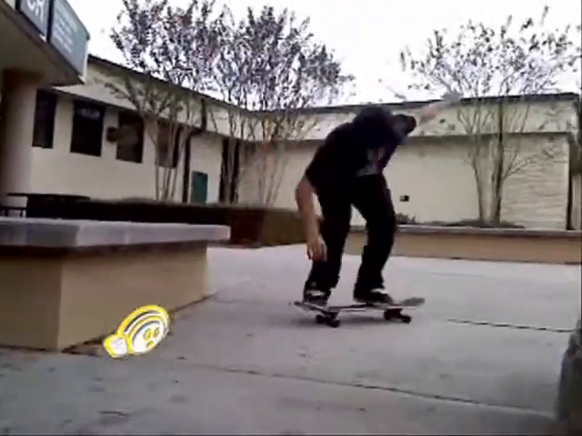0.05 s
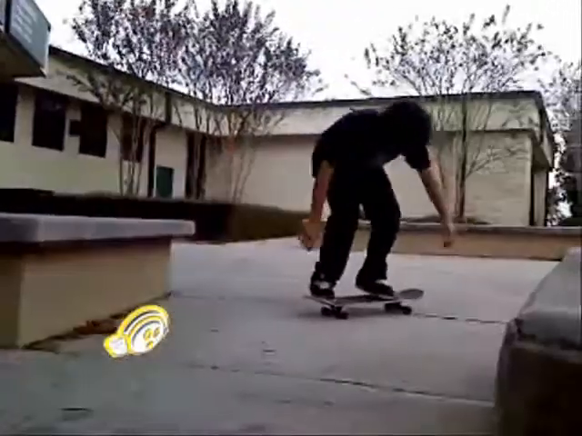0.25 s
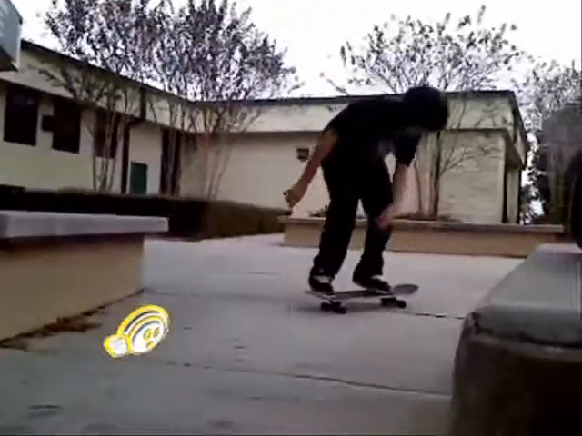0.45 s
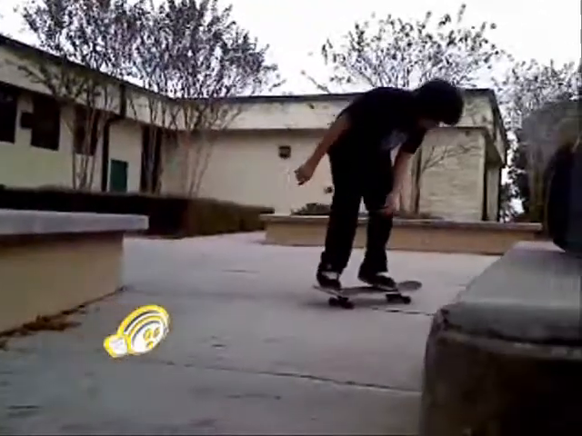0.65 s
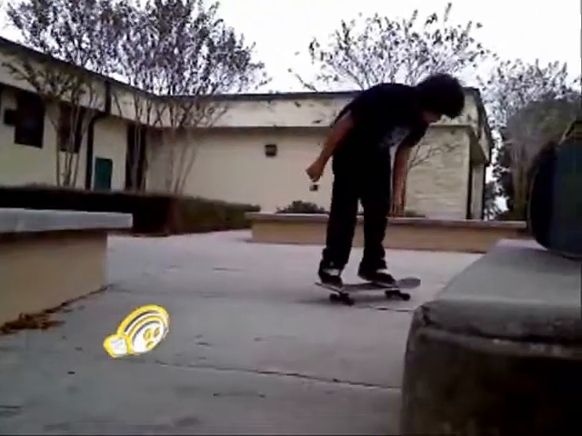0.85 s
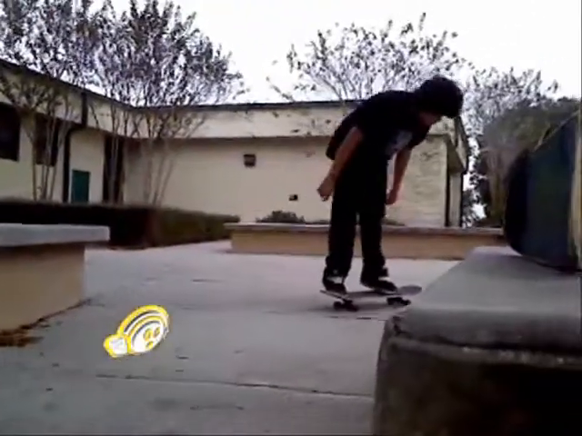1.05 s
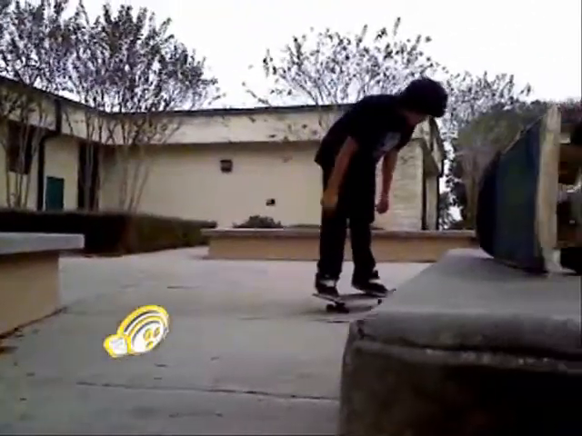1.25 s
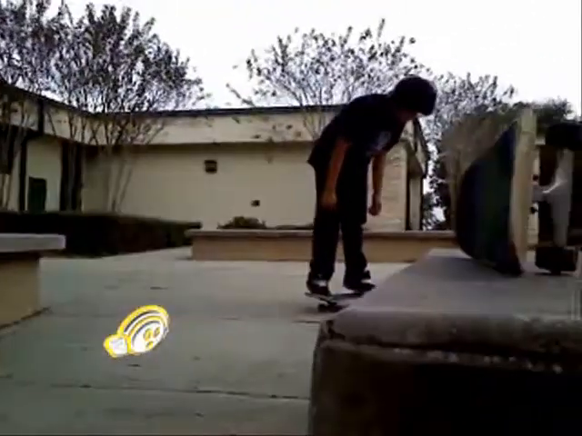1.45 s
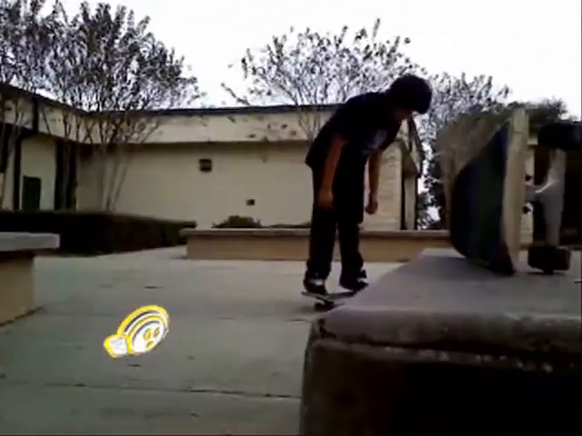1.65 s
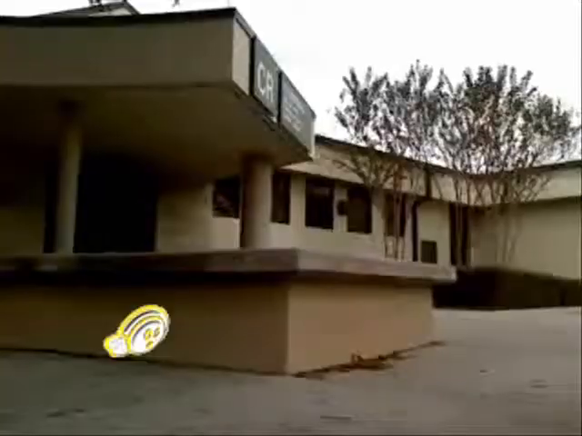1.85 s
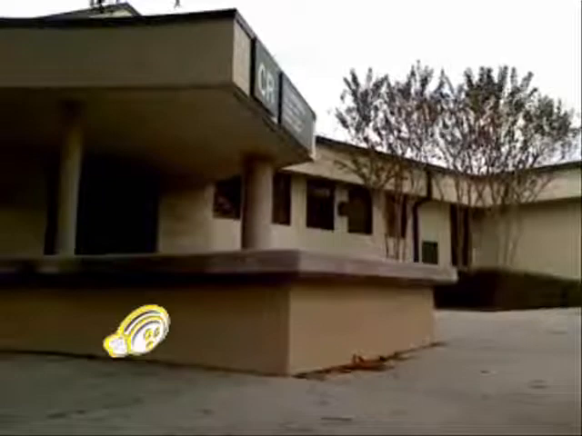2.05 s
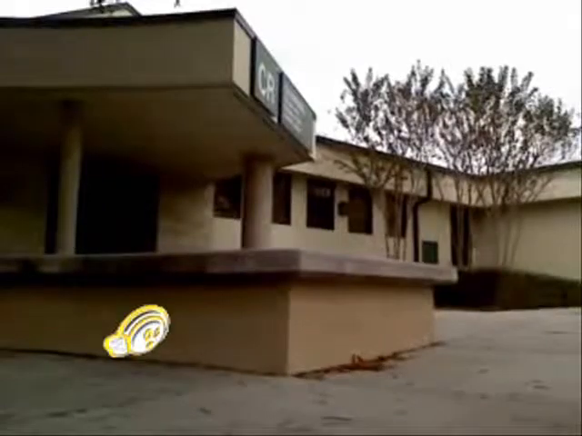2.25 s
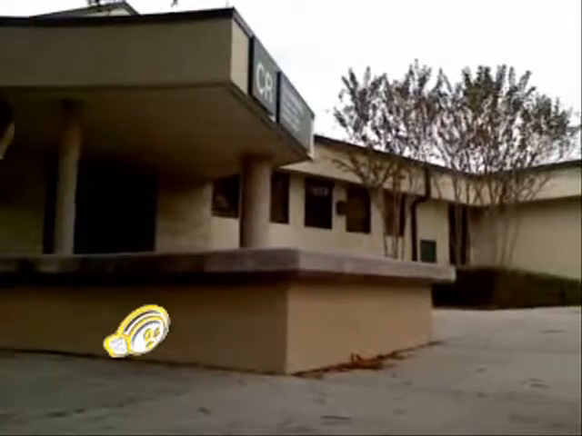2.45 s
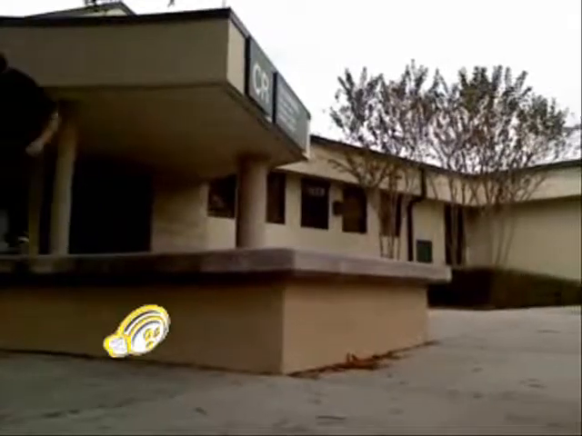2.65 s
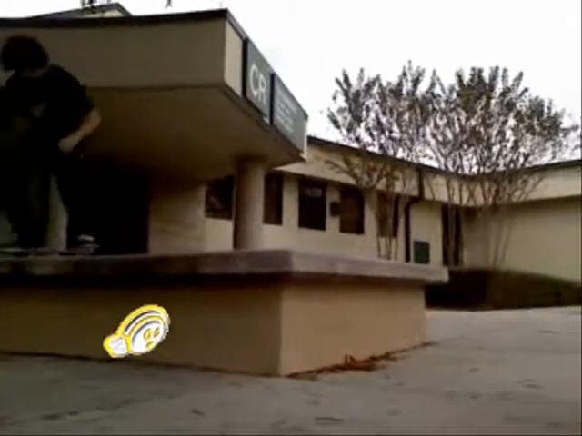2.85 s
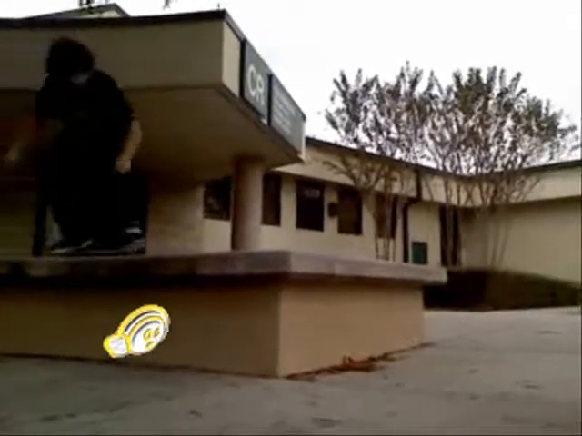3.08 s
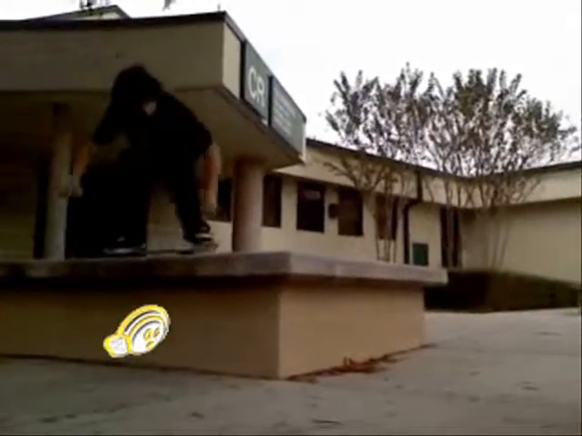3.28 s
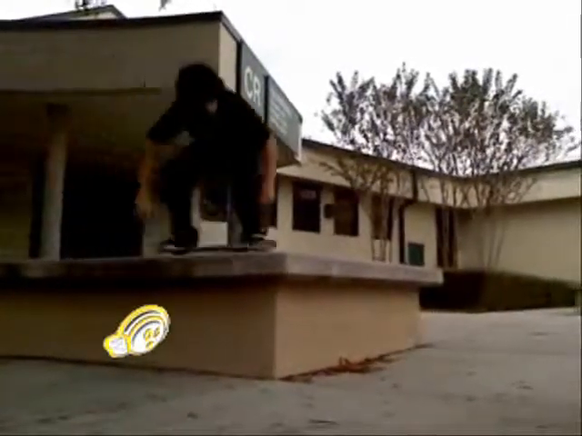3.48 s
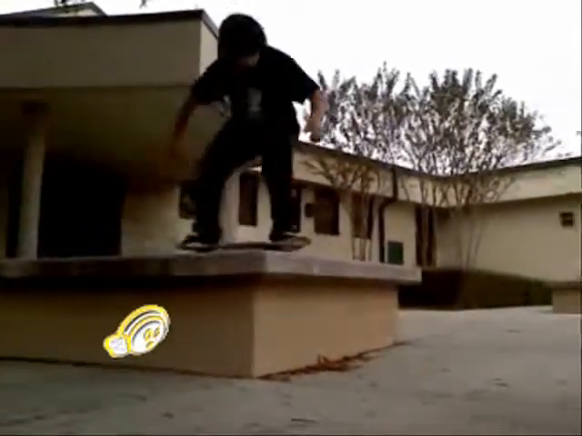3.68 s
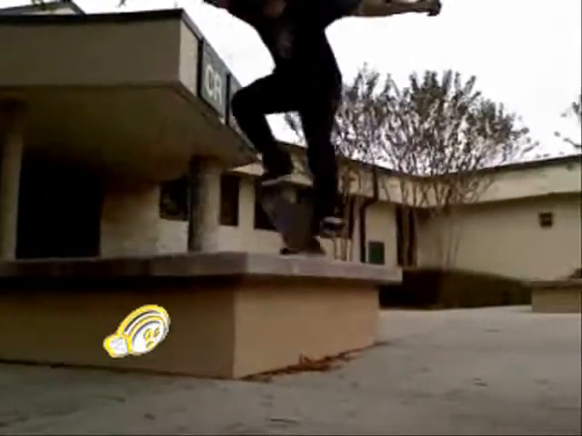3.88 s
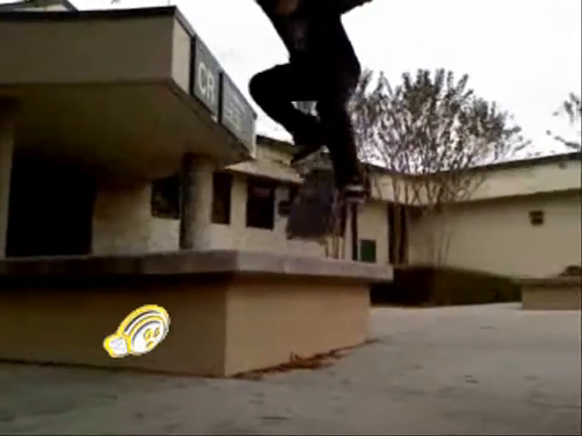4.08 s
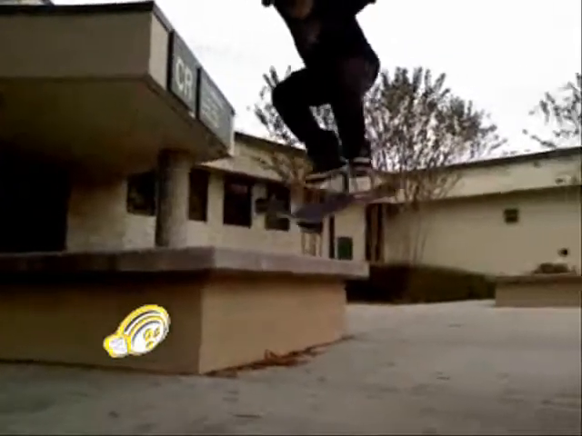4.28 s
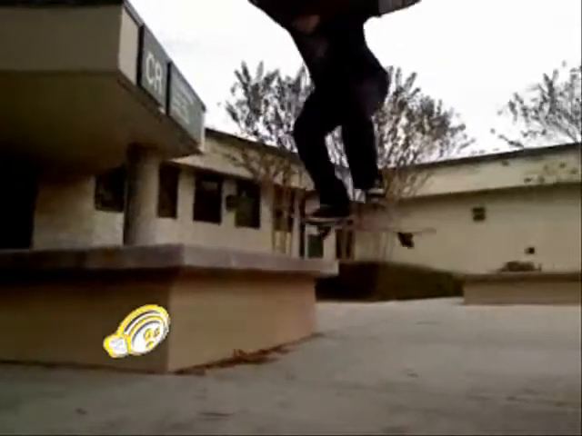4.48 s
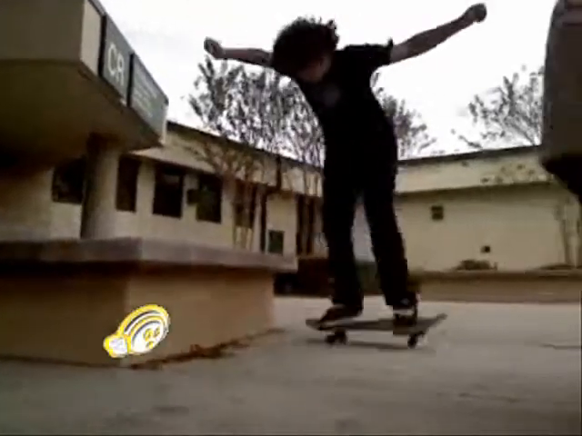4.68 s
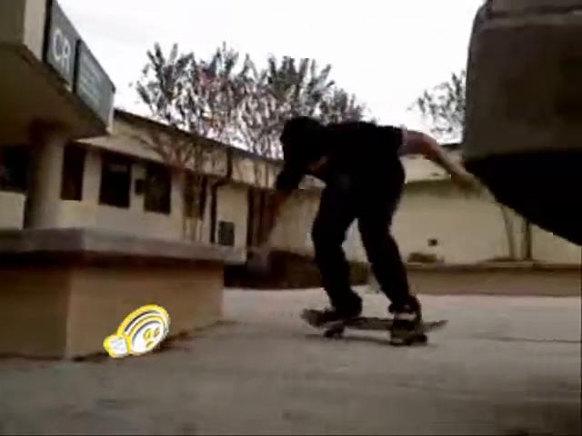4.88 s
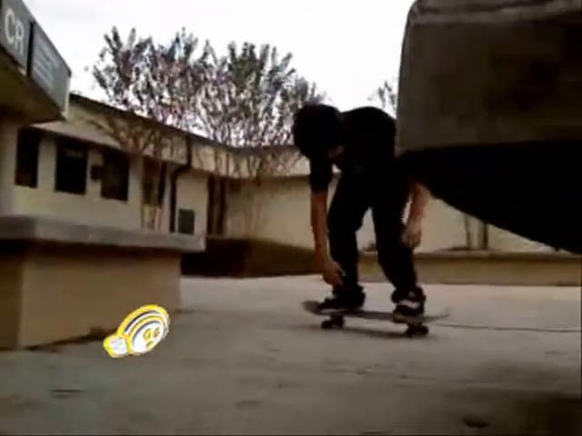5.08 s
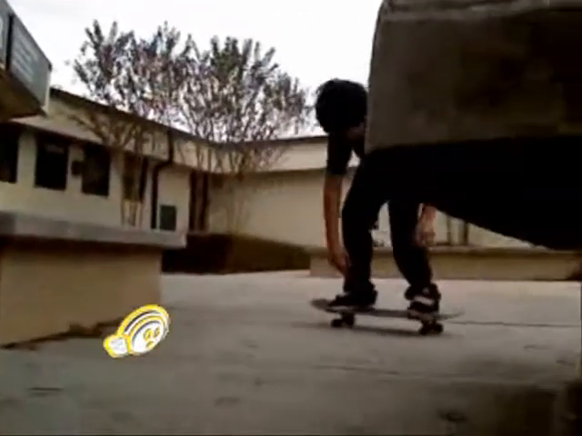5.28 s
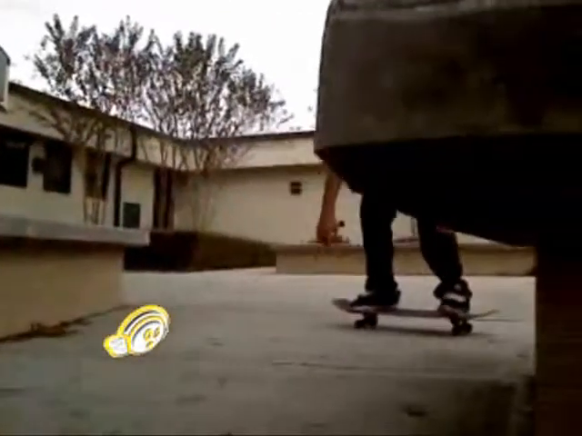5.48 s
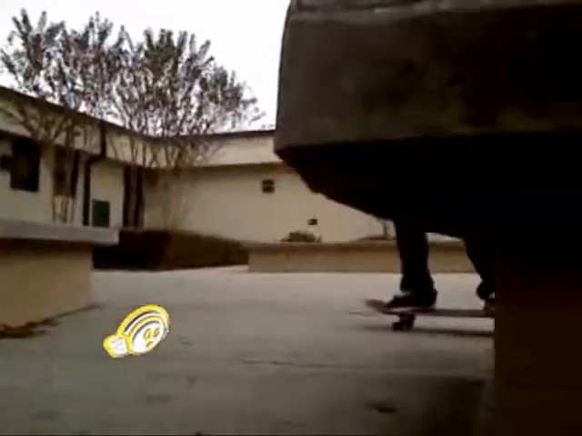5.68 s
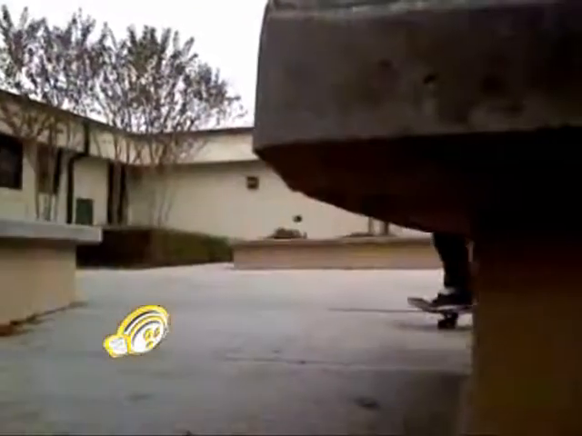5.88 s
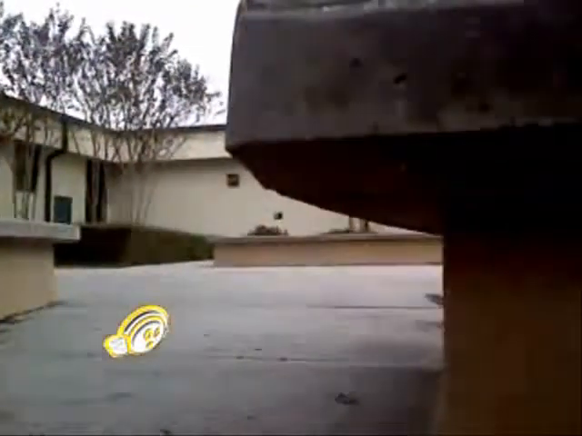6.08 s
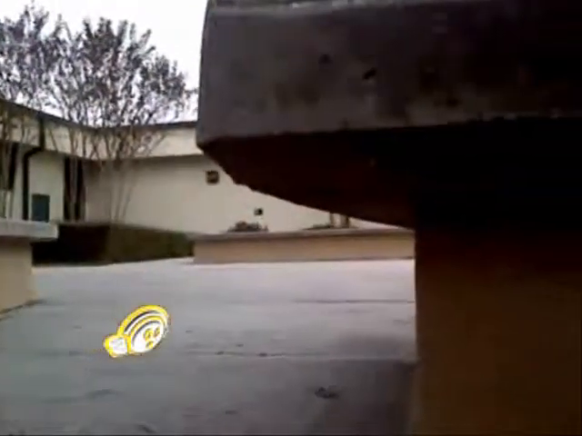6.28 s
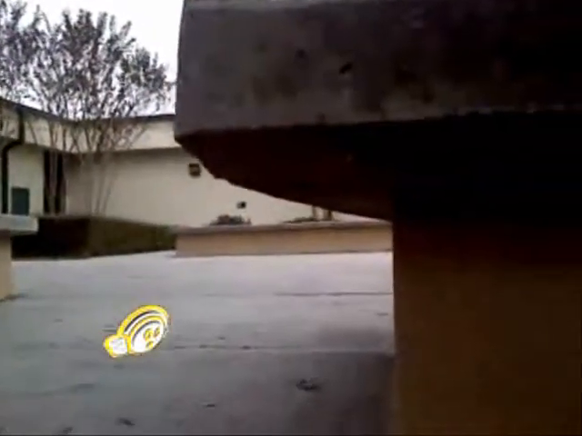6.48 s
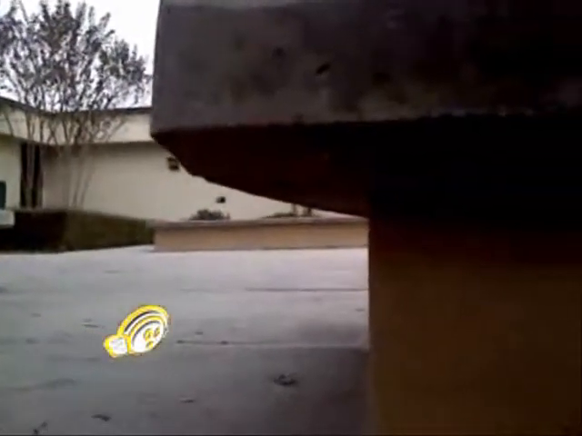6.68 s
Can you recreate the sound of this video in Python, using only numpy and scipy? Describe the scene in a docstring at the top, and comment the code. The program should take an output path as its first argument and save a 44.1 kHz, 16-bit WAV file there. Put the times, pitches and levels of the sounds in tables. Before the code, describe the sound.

A skateboard lands with a sharp wood and metal clatter, then rolls over rough concrete, knocking on cracks. A lighter clack takes it onto a ledge and a truck squeaks faintly. A flip follows in slow motion, with a deeper pop and a shoe scrape, then a loud landing at normal speed and more rolling. Walls give a short echo, and the dull handheld microphone picks up small handling ticks.

```python
"""A skateboard lands, rolls away, hops onto a concrete ledge, flips off it and lands in a walled yard.
Each pop or landing is a cluster of blows on the wooden deck and metal trucks; between them the wheels
rumble, hiss and knock over cracks. A truck squeaks, the wheels chirp and a shoe scrapes the grip tape.
A small narrow-band camera ticks and rubs in the hand. The flip plays at half speed, an octave down."""
import sys
import numpy as np
from scipy import signal
from scipy.fft import rfft, irfft
from scipy.io import wavfile
from scipy.ndimage import uniform_filter1d, map_coordinates

SR = 44100
rng = np.random.default_rng(int(sys.argv[2]) if len(sys.argv) > 2 else 0)


def materialize(psi):
    """Save the field psi as 16-bit PCM at rate SR to the path in sys.argv[1].

    A 1-D psi becomes a single channel; in a 2-D psi each row is a channel.
    """
    bounded = np.clip(np.atleast_2d(psi).T, -1, 1)
    quanta = np.round(bounded * 32767).astype(np.int16)
    wavfile.write(sys.argv[1], SR, quanta)


N = 297234
TIME = np.arange(N) / SR
SLOW_FROM_S, SLOW_TO_S = 3.895, 4.693  # event times are playing times; pitches, decays are at true speed


def amp(db):
    """Decibels to gain."""
    return 10 ** (np.asarray(db) / 20)


def unit_rms(x):
    """Scales to rms 1."""
    return x / np.sqrt(np.mean(x ** 2) + 1e-20)


def unit_blow(x):
    """Scales to the energy of 4 ms at rms 1."""
    return x / np.sqrt(np.sum(x ** 2) / (.004 * SR) + 1e-20)


def log_interp(points, hz):
    """Interpolates on a log-frequency axis."""
    knots_hz, values = np.transpose(points)
    return np.interp(np.log(hz + 1), np.log(knots_hz), values)


def action_time(s):
    """Playing time to time of the action, which runs at half speed during the flip."""
    return s - .5 * np.clip(s - SLOW_FROM_S, 0, SLOW_TO_S - SLOW_FROM_S)


def add(mix, s, sound):
    """Mixes a sound in at playing time s."""
    part = mix[max(round(action_time(s) * SR), 0):][:len(sound)]
    part += sound[:len(part)]


def colour(x, points, size=4096):
    """Minimum-phase filter through (frequency [Hz], gain [dB]) points."""
    log_gain = np.log(amp(log_interp(points, abs(np.fft.fftfreq(size, 1 / SR)))))
    taps = np.fft.ifft(np.exp(np.conj(signal.hilbert(log_gain)))).real[:size // 2]
    return signal.fftconvolve(x, taps)[:len(x)]


def resonate(x, hz, width_hz):
    """A resonance at hz, constant or gliding."""
    carrier = np.exp(2j * np.pi * np.cumsum(hz * np.ones(len(x))) / SR)
    pole = np.exp(-np.pi * width_hz / SR)
    return 2 * (carrier * signal.lfilter([1 - pole], [1, -pole], x / carrier)).real


def contact(t, t60_s, crunch):
    """One sharp push, then a brief crunch of grit."""
    grit = rng.standard_normal(len(t)) * amp(-60 * t / t60_s) * (1 - np.exp(-t / .0012))
    return signal.unit_impulse(len(t)) + crunch * grit / np.linalg.norm(grit)


def grainy(per_s, spread_db, wash):
    """Many small impacts of uneven size over a smooth wash."""
    sizes = amp(spread_db * np.minimum(rng.exponential(1, N), 4)) * rng.choice([-1, 1], N)
    impacts = unit_rms(sizes * (rng.random(N) < per_s / SR))
    return unit_rms(impacts + wash * rng.standard_normal(N))


def patchy(x, depth_db):
    """Resonances come and go as the board moves over changing ground."""
    spectra = signal.stft(x, SR, nperseg=1024, noverlap=768)[2]
    patches = uniform_filter1d(rng.standard_normal(spectra.shape), size=4, axis=0)
    patches = unit_rms(uniform_filter1d(patches, size=16, axis=1))
    return signal.istft(spectra * amp(depth_db * patches), SR, nperseg=1024, noverlap=768)[1][:N]


YARD_DECAY = [(100, 0.57), (300, 0.66), (700, 0.71), (1500, 0.79), (2200, 0.5935), (3600, 0.63)]  # tail decay: (frequency [Hz], t60 [s])
YARD_SPECTRUM = [(60, 4), (250, -4.5), (600, -6), (1000, -6.5), (1700, -2), (2400, 1), (3000, -3.5),
                 (3700, -1)]  # tail colour: (frequency [Hz], gain [dB])
def diffuse_tail(x):
    """Reverberation between the buildings, each band dying at its own rate."""
    hz, t, spectra = signal.stft(rng.standard_normal(SR), SR, nperseg=256)
    decay = amp(-60 * t / log_interp(YARD_DECAY, hz)[:, None])
    tail = signal.istft(spectra * decay * (1 - np.exp(-t / .002)), SR, nperseg=256)[1]
    tail *= amp(-1.5) / np.linalg.norm(tail)
    return signal.fftconvolve(x, colour(tail, YARD_SPECTRUM))[:N]


# single reflections: (delay [s], gain [dB])
WALL_ECHOES = [(.011, -18), (.026, -21.5), (.037, -14), (.052, -15), (.068, -20.5), (.112, -32)]
def courtyard(sent):
    """Wall slaps and two crossfaded tails: blows of the moving board meet different echo patterns."""
    phase = 2 * np.pi * 7 * TIME
    tails = diffuse_tail(sent * np.cos(phase)) + diffuse_tail(sent * np.sin(phase))
    slaps = sum(amp(db) * np.interp(TIME - delay_s, TIME, sent, left=0) for delay_s, db in WALL_ECHOES)
    return slaps + patchy(tails, depth_db=1)


# finger on plastic: (frequency [Hz], gain [dB])
RUB_SPECTRUM = [(100, -23), (350, -11), (700, -25), (1000, -8.5), (1700, -44), (2500, -7), (3200, 9),
                (3700, 5), (4500, -26)]
def finger_rub(from_s=1.885, to_s=1.98, peak_db=-36.5):
    """A finger stutters over the camera housing, pressing harder until it lets go."""
    attack_db = -600 * np.maximum(from_s - TIME, 0)
    growth_db = -122 * np.maximum(to_s - TIME, 0)
    release_db = -550 * np.maximum(TIME - to_s, 0)
    stutter = 1 + .4 * np.sin(2 * np.pi * 210 * TIME)
    friction = unit_rms(colour(rng.standard_normal(N), RUB_SPECTRUM))
    return friction * stutter * amp(peak_db + attack_db + growth_db + release_db)


# camera ticks: (time [s], strength [dB], snap [Hz], relative knock [dB])
HOUSING_TICKS = [(1.2445, -24, 2890, -37), (1.548, -35, 2330, 2.5), (3.0991, -23.5, 3280, -8),
                 (3.710, -37.5, 2870, -14), (4.722, -23, 2400, -4.5), (4.7258, -24, 2820, -2),
                 (6.205, -34, 2204, -12), (6.212, -24.5, 3100, -21), (6.356, -32, 3500, 1)]
def housing_ticks():
    """The plastic housing snaps, rattles and knocks right at the microphone."""
    t, out = np.arange(SR // 20) / SR, np.zeros(N)
    knock_spectrum = [(30, -11), (300, -10), (1200, 0), (3000, -12.5)]
    for s, db, hz, knock_db in HOUSING_TICKS:
        snap = unit_blow(amp(-60 * t / .0024) * t * np.sin(2 * np.pi * hz * t))
        rattle = unit_blow(colour(contact(t, t60_s=.0091, crunch=24), CLACK_SPECTRUM))
        knock = unit_blow(colour(contact(t, t60_s=.0058, crunch=1), knock_spectrum))
        add(out, s, amp(db - 6) * (snap + amp(-3) * rattle + amp(knock_db) * knock))
    return out


# short squeaks: (time [s], length [s], pitch [Hz], level [dB])
SHORT_SQUEAKS = [(3.328, 0.091, 1400, -48), (3.926, 0.01, 2530, -52.5), (3.997, 0.02, 2496, -52.5)]
def squeaks():
    """One rough truck squeak, then two brief wheel chirps before the flip."""
    out = np.zeros(N)
    for s, length_s, hz, db in SHORT_SQUEAKS:
        slips = rng.standard_normal(int(length_s * SR))
        squeak = resonate(resonate(slips, hz, width_hz=220), hz, width_hz=160)
        add(out, s, amp(db) * unit_rms(squeak * np.hanning(len(slips))))
    return out


# shoe on grip tape: (time [s], relative level [dB])
SCRAPE_ENVELOPE = [(4.19, -27), (4.252, -36), (4.324, -34.5), (4.462, -49.5), (4.476, -44.5), (4.6, -62)]
def shoe_scrape(hz=2290, width_hz=620):
    """The front shoe drags up the grip tape and flicks the board into its flip."""
    grit = grainy(per_s=990, spread_db=2, wash=.57)
    s, db = np.transpose(SCRAPE_ENVELOPE)
    envelope = amp(np.interp(TIME, action_time(s), db - 2.5, left=-120, right=-120))
    return envelope * unit_rms(resonate(resonate(grit, hz, width_hz), hz, width_hz))


# stretches of rolling: (start [s], relative rumble [dB], relative hiss [dB], fade [dB/s], whirr [Hz])
ROLL_STRETCHES = [(0, -56.5, -47, 6, 2453), (1.83, -60.5, -55.5, 4.5, 2410), (2.3, -55.5, -46, 4.5, 2615),
                  (3.9, -60, -53, 0, 2510), (4.7, -59, -46.5, -1, 2300), (4.95, -53, -52, -1.5, 1850),
                  (6.13, -60, -55.5, 3, 1724)]
# weight on the wheels: (centre [s], half length [s], boost [dB])
RIDER_LEANS = [(.3, .08, 5.5), (0.59, 0.046, 3), (3.037, 0.09, 2.5), (5.545, 0.081, 3.5), (5.995, 0.056, 5),
               (6.737, 0.12, 6)]
def roll_curves(sag_hz_per_s=144, blend_s=.088):
    """Rumble dB, hiss dB, whirr Hz: level drifts with distance and swells on leans; the wheels slow."""
    start_s, rumble_db, hiss_db, fade_db_per_s, whirr_hz = np.transpose(ROLL_STRETCHES)
    stretch = np.searchsorted(action_time(start_s[1:]), TIME)
    age_s = TIME - action_time(start_s)[stretch]
    fade_db = fade_db_per_s[stretch] * age_s
    lean_db = sum(db * np.exp(-((TIME - action_time(s)) / half_s) ** 2) for s, half_s, db in RIDER_LEANS)
    curves = [rumble_db[stretch] - .65 * fade_db + lean_db,
              hiss_db[stretch] - fade_db + lean_db,
              whirr_hz[stretch] - sag_hz_per_s * age_s]
    return uniform_filter1d(np.array(curves), int(blend_s * SR), axis=1)


# rolling deck and wheels: (frequency [Hz], gain [dB])
RUMBLE_SPECTRUM = [(20, -18), (60, -14.5), (140, -12.5), (280, -1), (420, -1), (700, 1.5), (1050, 1),
                   (1400, 8), (1900, -23.5), (3000, -24)]
HISS_SPECTRUM = [(900, -16), (1500, 0.5), (2200, 2.5), (2800, -1.5), (3350, 2.5), (3800, -6.5),
                 (5000, -17.5)]
def wheels():
    """Rough concrete shakes the deck and makes the wheels hiss and whirr."""
    rumble_db, hiss_db, whirr_hz = roll_curves()
    road = grainy(per_s=1100, spread_db=.5, wash=.92)
    bumps = unit_rms(uniform_filter1d(uniform_filter1d(rng.standard_normal(N), size=700), size=500))
    rumble = amp(rumble_db + 1.02) * unit_rms(colour(road, RUMBLE_SPECTRUM))
    hiss = amp(hiss_db - 2.5) * unit_rms(colour(road, HISS_SPECTRUM))
    shiver = resonate(grainy(per_s=800, spread_db=4, wash=.29), whirr_hz, width_hz=350)
    whirr = amp(hiss_db - 6) * unit_rms(resonate(shiver, whirr_hz, width_hz=350))
    return patchy(rumble + hiss + whirr, depth_db=3) * amp(.84 * bumps)


# cracks: (time [s], strength [dB], thud [dB], clack [dB], second wheel delay [s], its gain [dB])
GROUND_CRACKS = [(.315, -38, -12, 5.5, .106, 1), (.678, -48.5, -14, -1, .101, 7.5),
                 (.910, -41, -4, 2.5, 0.039, -8.5), (2.712, -50.5, -8, 16, 0.02, -4.5),
                 (2.862, -35.5, 5.5, 2, 0.018, -3.5), (3.292, -39, 4, 8.5, 0.0091, 1.5),
                 (4.759, -43.5, -16, 8, 0.028, -0.5), (5.161, -41.5, 8, 3.5, 0.11, -12),
                 (5.679, -42.5, -19, 2, .18, 1), (5.939, -32.5, -6, 2.7, 0.02, -6.5),
                 (6.354, -36.5, 1, -3.5, 0.031, -3), (6.654, -46.5, -9, 2.5, 0.011, -2)]
def crack_hits(yard_db=-2.5):
    """A crack knocks two wheels in turn; yields one hit for each."""
    for s, db, thud_db, clack_db, delay_s, second_db in GROUND_CRACKS:
        yield s, db, thud_db, clack_db, yard_db
        yield s + delay_s, db + second_db, thud_db, clack_db, yard_db


def chatter(t, hz, half_width_hz, t60_s, rise_s=.0014):
    """One resonance, shaken at random as it dies away."""
    band = 1 / (1 + ((np.fft.rfftfreq(len(t), 1 / SR) - hz) / half_width_hz) ** 2)
    shake = irfft(rfft(rng.standard_normal(len(t))) * band)
    envelope = amp(-60 * t / t60_s) * (1 - np.exp(-t / rise_s))
    return unit_rms(shake * envelope) * np.sqrt(np.mean(envelope ** 2))


# lingering hum and low deck flex: (frequency [Hz], half width [Hz], gain [dB], t60 [s])
HUM_MODES = [(652, 62, -26, 0.31), (954, 45, -24.5, 0.17), (1650, 145, -24.5, .3), (1790, 130, -28, 0.62)]
FLEX_MODES = [(188, 19, -20.5, 0.052), (276.5, 19, -20, .11)]
def deck_booms(blows):
    """Each heavy blow booms at a pitch set by where it falls, then leaves the deck humming and flexing."""
    t, out = np.arange(16384) / SR, np.zeros(N)
    for s, strength_db, thud_db, _, _, boom_hz, boom_db in blows:
        boom = amp(boom_db) * chatter(t, boom_hz, half_width_hz=.08 * boom_hz, t60_s=.071)
        hum = sum(amp(db) * chatter(t, hz, half_hz, t60_s) for hz, half_hz, db, t60_s in HUM_MODES)
        flex = sum(amp(db) * chatter(t, hz, half_hz, t60_s) for hz, half_hz, db, t60_s in FLEX_MODES)
        add(out, s, amp(strength_db) * (boom + hum + amp(thud_db) * flex))
    return out


def ring(t, modes):
    """Dying modes, weighted at random for where the blow falls."""
    out = np.zeros(len(t))
    for hz, db, t60_s in modes:
        weight = rng.uniform(.57, 1) * rng.choice([-1, 1])
        detune = 1 + .0074 * rng.standard_normal()
        out += weight * amp(db - 60 * t / t60_s) * np.sin(2 * np.pi * hz * detune * t)
    return unit_blow(out)


# low thud, wood knock, metal clack: (frequency [Hz], gain [dB])
THUD_SPECTRUM = [(20, -15), (65, -15), (120, -19.5), (190, -6.5), (270, -0.5), (420, 0.5), (650, -3.5),
                 (1500, -40)]
KNOCK_SPECTRUM = [(200, -34), (450, -8), (650, -2), (950, -5), (1200, -4.5), (1600, 0), (2000, -7.5),
                  (3000, -28)]
CLACK_SPECTRUM = [(800, -34), (1500, -15), (2100, 3.5), (2700, 2), (3400, -2), (3900, -6.5), (5000, -41)]
# wooden deck, metal trucks: (frequency [Hz], gain [dB], t60 [s])
DECK_MODES = [(273, -17.5, 0.109), (352, -4, 0.056), (486, -17.5, 0.059), (603, -5.5, 0.031),
              (660, -17, 0.054), (860, 1, 0.0348), (945, -5.5, 0.077), (1019, -11.5, 0.053),
              (1245, 4, 0.05), (1436, 5, 0.053), (1522, -2, 0.037), (1790, 0.5, 0.14)]
TRUCK_MODES = [(2060, -2, 0.037), (2285, -13.5, 0.023), (2524, -4.5, 0.036), (2895, -6.5, 0.017),
               (2970, -15, 0.025), (3285, 12, 0.018), (3490, 0, 0.049)]
def strike(thud_db, clack_db):
    """One blow thuds, knocks the wood and clacks the metal."""
    t = np.arange(SR // 6) / SR
    thud = unit_blow(colour(contact(t, t60_s=.075, crunch=.88), THUD_SPECTRUM))
    wood = unit_blow(colour(contact(t, t60_s=.024, crunch=1.6), KNOCK_SPECTRUM))
    wood += amp(-3.5) * ring(t, DECK_MODES)
    metal = unit_blow(colour(contact(t, t60_s=.046, crunch=4.11), CLACK_SPECTRUM))
    metal += amp(-2.5) * ring(t, TRUCK_MODES)
    return amp(-3.5) * (amp(thud_db - 7) * thud + wood + amp(clack_db) * metal)


# tail, wheels and feet in the first landing, ledge hop, flip and last landing:
# (time [s], strength [dB], thud [dB], clack [dB], yard send [dB], boom [Hz], boom [dB])
TRICK_BLOWS = [(.0255, -15, -5, -4.5, -5, 840, -4.5), (.031, -21.5, 0.5, 7.5, 6.5, 830, -10),
               (.047, -15, -23, -6, -27, 610, -8.5), (.0587, -13.5, -17, -21, -6, 520, -8.5),
               (.066, -22.5, -1, 7.5, 1, 1550, -3), (.097, -14.5, -22, -5.5, -18, 1610, -5),
               (2.274, -32, -13, 4.5, 5, 676, 5), (2.278, -29.5, 1, 7.5, 3.5, 930, 5.5),
               (2.302, -25.5, -8, -1.5, 1, 957, 2.5), (2.309, -30, -10, 9.5, 2.5, 555, 4),
               (2.326, -34, -16, 1, -1, 670, 6.5), (4.172, -32.5, -14, 1.5, -12, 2260, -6),
               (4.181, -28.5, -21, 4, -10.5, 2330, 2), (4.192, -28.5, -9.5, -2, 0, 1900, -9),
               (4.266, -42.5, -22, -5, -2, 1770, 11), (4.315, -36.5, -27, -8, -4, 2240, 5),
               (4.347, -42.5, -21, -3, -7, 2130, 8.5), (4.889, -28, -10, 11.5, 7, 955, -15),
               (4.8922, -17.5, 0.5, 5.5, -10, 940, 5), (4.9067, -10, 4, -1.5, -6, 963, -1.5),
               (4.9171, -10, -4, -2, -3, 1090, -9), (4.944, -20.5, -17, 6, -19, 1790, -2),
               (4.956, -17.5, -8, -6, -1, 1650, -14), (4.975, -20.5, -26, -27, -6.5, 1810, -1),
               (5.025, -27.5, 2, -3, 6, 1800, 3.5), (5.046, -39, 11, -9, -4, 1790, 9)]
def board():
    """Tricks and cracks strike the board; returns the direct sound and what reaches the walls."""
    direct, sent = np.zeros(N), np.zeros(N)
    hits = [row[:5] for row in TRICK_BLOWS] + list(crack_hits())
    for s, db, thud_db, clack_db, yard_db in hits:
        blow = amp(db) * strike(thud_db, clack_db)
        add(direct, s, blow)
        add(sent, s, amp(yard_db) * blow)
    return direct, sent


def scene():
    """Everything that reaches the microphone, at true speed."""
    direct, sent = board()
    echoes = courtyard(sent)
    skateboard = direct + deck_booms(TRICK_BLOWS) + shoe_scrape() + wheels() + squeaks()
    return (skateboard + echoes + housing_ticks() + finger_rub())[None]


def record(dry, band_hz=3800, mirror_hz=4070, edge_hz=15600):
    """Narrow-band camera, flip slowed an octave; coarse resampling adds faint mirror images and fizz."""
    narrow = signal.fftconvolve(dry[0], signal.firwin(241, band_hz, window=("kaiser", 5), fs=SR), "same")
    played = map_coordinates(narrow, [action_time(TIME) * SR], order=3)
    jitter = .09 * np.cumsum(rng.standard_normal(N))
    phase = 2 * np.pi * mirror_hz * action_time(TIME) + jitter
    mirrors_db = [-21, -26, -29, -33, -32.5, -36.5]
    mirrors = sum(amp(db) * np.cos(k * phase) for k, db in enumerate(mirrors_db, start=1))
    fizz_spectrum = [(2000, -16), (5500, -8), (7500, -6.5), (16000, -2.5)]
    fizz = amp(-31) * unit_rms(colour(rng.standard_normal(N), fizz_spectrum))
    clipped = np.clip(played * (1 + mirrors + fizz), -1, 1)
    edge_taps = signal.firwin(401, edge_hz, window=("kaiser", 8), fs=SR)
    return signal.fftconvolve(clipped, edge_taps, "same")[None]


dry = scene()
out = record(dry)
materialize(out)
```